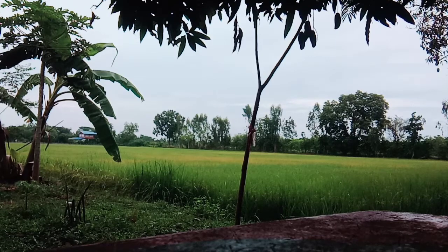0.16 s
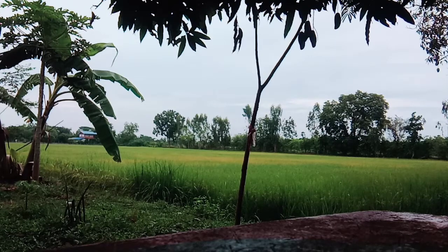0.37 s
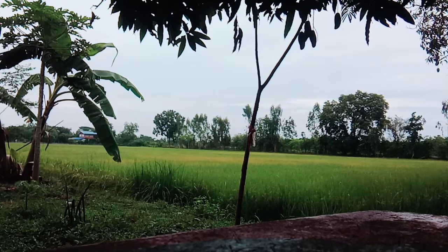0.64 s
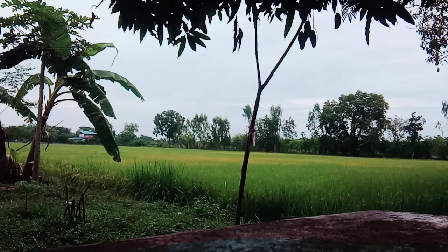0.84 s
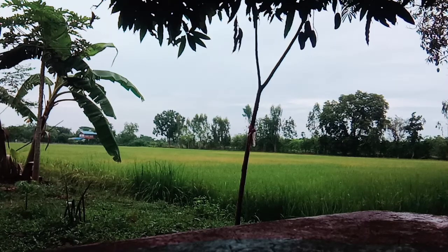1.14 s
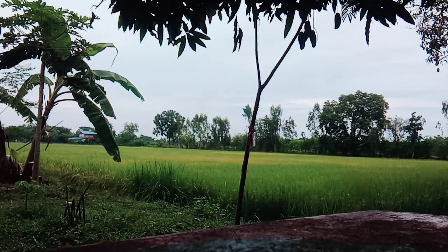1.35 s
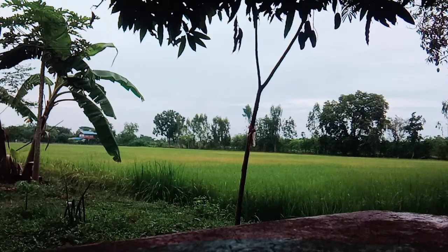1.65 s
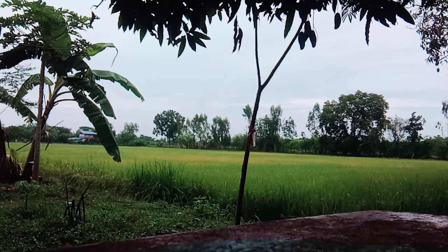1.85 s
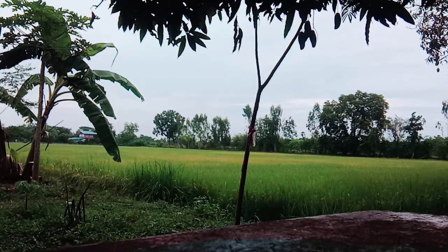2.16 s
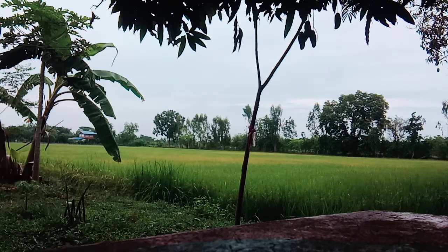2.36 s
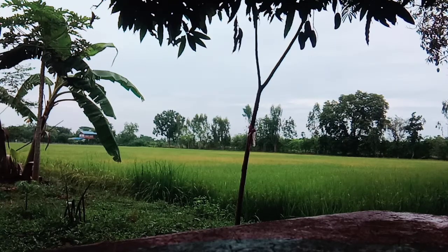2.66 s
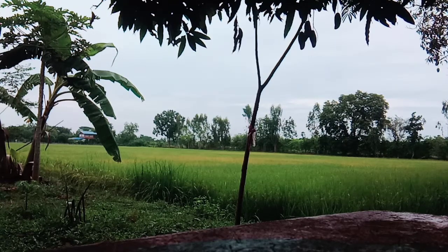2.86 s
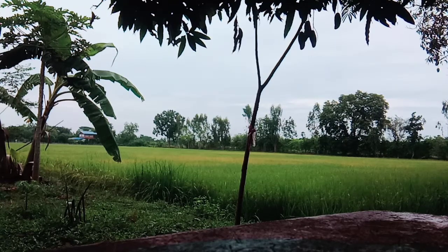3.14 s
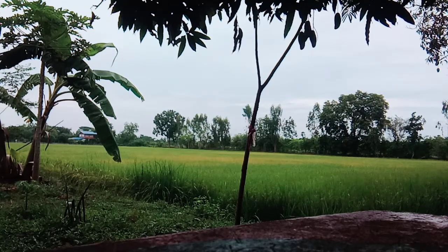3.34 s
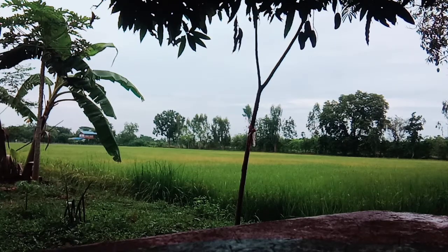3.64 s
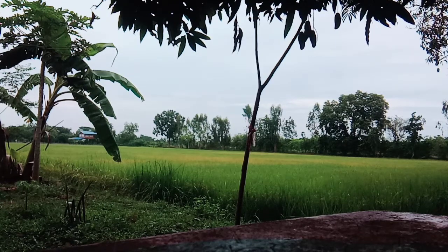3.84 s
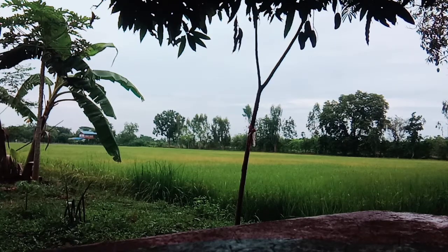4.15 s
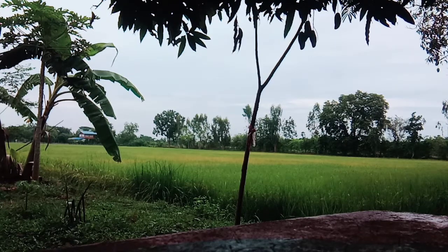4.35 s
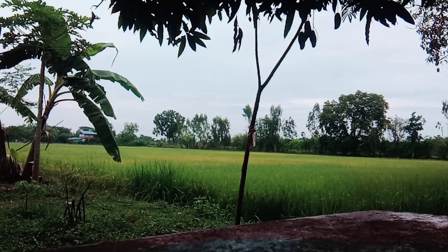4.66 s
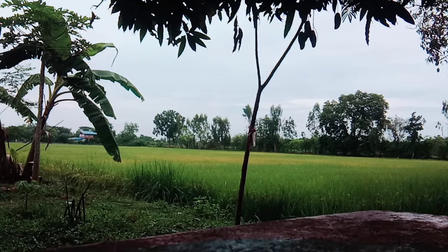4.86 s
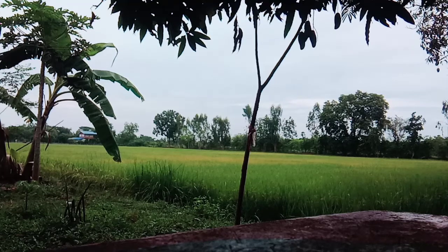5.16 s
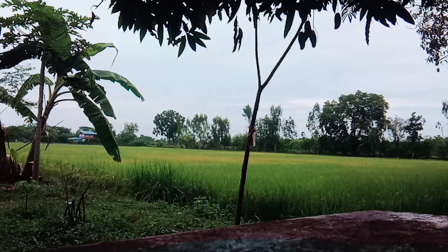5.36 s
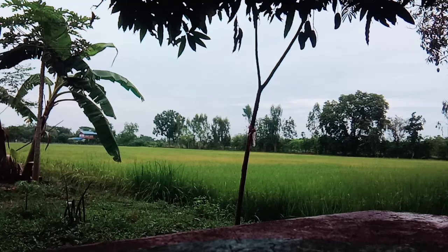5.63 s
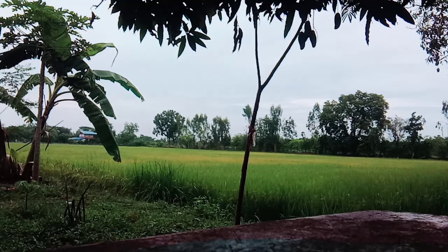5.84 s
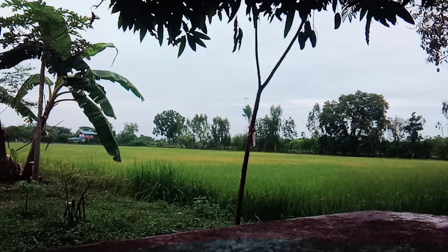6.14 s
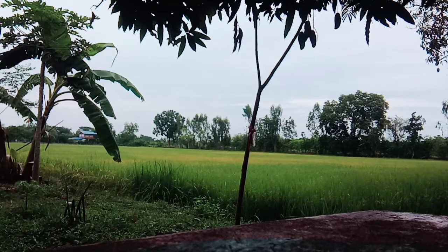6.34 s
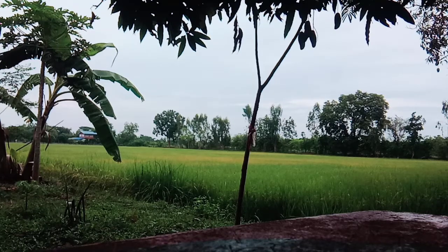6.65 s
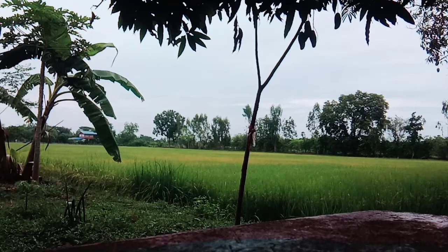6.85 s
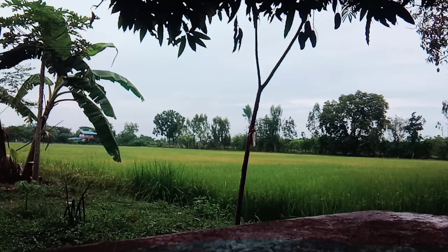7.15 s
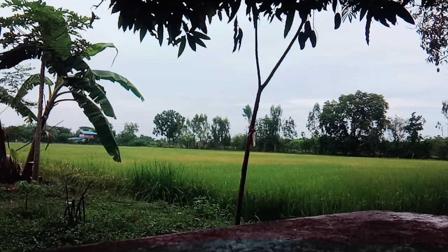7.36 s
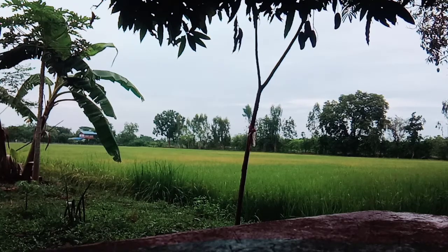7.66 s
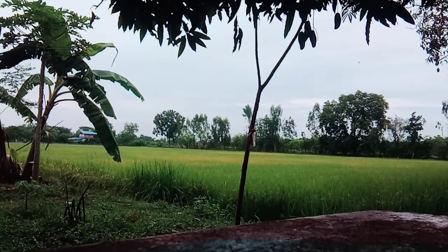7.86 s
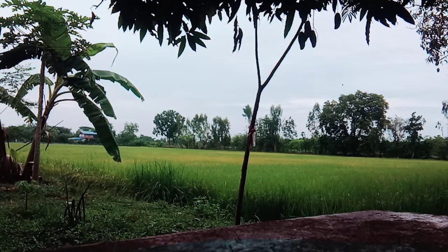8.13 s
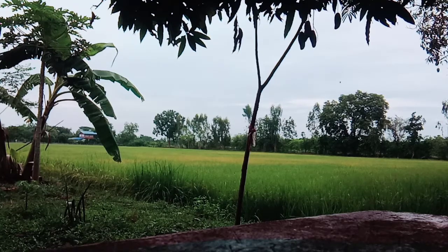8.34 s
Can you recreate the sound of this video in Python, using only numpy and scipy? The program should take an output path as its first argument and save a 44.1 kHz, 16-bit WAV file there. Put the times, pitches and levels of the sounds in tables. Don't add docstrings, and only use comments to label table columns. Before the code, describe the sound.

Quiet morning beside a rice field, heard from one fixed microphone. A nearby sparrow gives sharp, three-part falling chirps about every 0.8 seconds. A cuckoo-like bird whistles repeated arches and a stepping flourish, another answers fainter, then the flourish returns. Low hollow hoots join in the second half, with a couple of dull wooden knocks. Thin insect hiss, distant songbirds and a faint revving engine lie behind.

```python
import sys
import numpy as np
from scipy import signal
from scipy.fft import rfft, irfft
from scipy.io import wavfile
from scipy.ndimage import uniform_filter1d

SR = 44100
rng = np.random.default_rng(int(sys.argv[2]) if len(sys.argv) > 2 else 0)


def waveform_to_disk(signal):
    frames = np.transpose(np.atleast_2d(signal))
    scaled = np.clip(frames, -1, 1) * 32767
    samples = np.round(scaled).astype(np.int16)
    wavfile.write(sys.argv[1], SR, samples)


def rack_gain(trim_db):
    fader = np.asarray(trim_db, float)
    return 10 ** (fader / 20)


N = 374850


def line(rows):
    s, *columns = np.transpose(rows)
    return [np.interp(np.arange(N) / SR, s, c) for c in columns]


def unit(x):
    return x / np.sqrt(np.mean(x ** 2))


def add(out, s, x):
    i = int(s * SR)
    out[i:i + len(x)] += x[:N - i]


def walk(rate, size=N):
    hold = max(int(SR / rate), 2)
    steps = np.repeat(rng.standard_normal(size // hold + 1), hold)
    return 1.262 * uniform_filter1d(uniform_filter1d(steps, hold), hold)[:size]


def shaped(gain):
    spectrum = rfft(rng.standard_normal(N))
    return unit(irfft(spectrum * gain(np.arange(N // 2 + 1) * SR / N + 1), N))


def band(hz, width_hz):
    return shaped(lambda f: np.exp(-((f - hz) / (.6 * width_hz)) ** 4))


def echoes(x, wet_db, t60, density):
    t = np.arange(int(.6 * SR)) / SR
    chance = rng.random(len(t))
    reflected = (chance < density / SR) * rng.standard_normal(len(t))
    tail = reflected * 1000. ** (-t / t60) * (t > .002)
    tail *= rack_gain(wet_db) / np.sqrt(np.sum(tail ** 2))
    tail[0] = 1
    return signal.fftconvolve(x, tail) / np.sqrt(np.sum(tail ** 2))


def tone(hz):
    return np.sqrt(2) * np.sin(2 * np.pi * np.cumsum(hz) / SR)


def whistles(rows, turn, flutter_db, wet_db, t60, waver=0.0029, fade_db=-3):
    out = np.zeros(N)
    for start, length, first, top, last, db in rows:
        u = np.linspace(0, 1, int(length * SR))
        up = np.clip(u / turn, 0, 1)
        down = np.clip((u - turn) / (1 - turn), 0, 1)
        pitch = first + (top - first) * np.sin(up * np.pi / 2) + (last - top) * down ** 1.517
        pitch *= 1 + waver * walk(70.5, size=30000)[:len(u)]
        swell = np.clip(np.minimum(u, 1 - u) * length / 0.0041, 0, 1)
        level_db = db + fade_db * down + flutter_db * walk(62.0, size=30000)[:len(u)]
        add(out, start, rack_gain(level_db) * swell * tone(pitch))
    return echoes(out, wet_db, t60, density=3000)[:N]


def chatter(low_hz, high_hz, length, glide, count):
    out, u = np.zeros(N), np.linspace(0, 1, int(length * SR))
    for when, place, slope, size in rng.random((count, 4)):
        pitch = low_hz * (high_hz / low_hz) ** place * (1 + glide * (2 * slope - 1) * u)
        add(out, when * N / SR, rack_gain(3 * size) * np.sin(np.pi * u) * tone(pitch))
    return unit(echoes(out, wet_db=1.5, t60=0.45, density=3000)[:N])


# (f/Hz, level/dB per Hz)
FIELD_SPECTRUM = [(15, -48), (25, -16), (106, 1.5), (220, -7), (346, -19.5), (508, -31.5), (1020, -14),
                  (1760, -28.5), (2840, -14.5), (3990, -24), (4670, -19.5), (5000, -32.5), (5600, -50),
                  (7280, -63.5), (12300, -120)]
# (t/s, far bird level/dB, breeze level/dB)
CHORUS_COURSE = [(0.0, -60.5, -70.5), (0.4, -57.5, -79.5), (0.92, -50.5, -74), (1.35, -54.5, -60.5),
                 (1.8, -50.5, -78), (2.1, -58, -65), (2.45, -55.5, -79), (2.9, -59.5, -75),
                 (3.5, -58.5, -76.5), (3.8, -53, -84), (4.8, -55.5, -75), (5.45, -53.5, -85),
                 (6.15, -61, -76.5), (6.6, -55, -73.5), (7.3, -55, -61), (7.75, -54.5, -67),
                 (8.05, -75.5, -72.5), (8.5, -56.5, -63.5)]
# (f/Hz, width/Hz, level/dB)
INSECT_BANDS = [
    (4756, 540, -63),
    (6938, 760, -68),
    (8100, 810, -94),
    (10700, 1300, -90.5),
]


def field():
    hz, db = np.transpose(FIELD_SPECTRUM)
    out = rack_gain(-48) * shaped(lambda f: rack_gain(np.interp(np.log(f), np.log(hz), db, right=-150)))
    low_db, rustle_db = line(CHORUS_COURSE)
    high_db = -56.5 + 0.27 * (low_db - low_db.mean()) + 1.8 * walk(5)
    out += rack_gain(rustle_db - 2.5 + 4.0 * walk(15)) * band(369, 570)
    low_notes = chatter(800, 1290, length=0.089, glide=0.099, count=400)
    out += rack_gain(low_db - 5) * (0.89 * low_notes + 1.08 * band(997, 630))
    high_notes = chatter(2300, 4200, length=0.0498, glide=0.23, count=700)
    out += rack_gain(high_db - 0.5) * (0.56 * high_notes + 0.75 * band(2510, 2200))
    for centre, width, level_db in INSECT_BANDS:
        out += rack_gain(level_db + 0.5 * walk(3.6) + 1.45 * walk(90)) * band(centre, width)
    hiss = shaped(lambda f: (f > 5000) * (7000 / f) ** 1.64)
    return out + rack_gain(-80.5) * hiss


# (t/s, firing rate f/Hz, level/dB)
ENGINE_REVS = [(0.0, 113, -57.5), (0.4, 100, -56), (0.8, 116.6, -53.5), (1.32, 123.5, -48.5),
               (1.9, 114, -54), (2.3, 105, -65), (2.85, 109, -62.5), (3.36, 113, -49), (3.5, 110, -61),
               (4.3, 93, -65.5), (4.55, 80, -57.5), (4.99, 115, -53), (5.73, 118, -50), (6.0, 119, -68),
               (6.25, 110, -55), (6.91, 119, -48), (7.7, 109.6, -56), (8.5, 114.8, -50)]


def engine():
    hz, db = line(ENGINE_REVS)
    hz = hz * (1 + 0.0246 * walk(25))
    second_db = -60 - 0.03 * (db - db.mean())
    first = rack_gain(db + 2.5 * walk(7.8)) * tone(hz)
    return first + rack_gain(second_db + 3.33 * walk(7)) * tone(2 * hz)


# (from t/s, to t/s, rasp rate f/Hz, centre f/Hz, width/Hz, level/dB)
KATYDID_SONG = (2.3, 6.15, 8.6, 8800, 900, -88)


def katydid():
    start, end, rate, hz, width_hz, db = KATYDID_SONG
    t = np.arange(N) / SR
    beat = np.sin(np.pi * np.cumsum(rate * (1 + .04 * walk(2))) / SR) ** 2
    fade = np.clip(np.minimum(t - start, end - t) / .2, 0, 1)
    return rack_gain(db) * beat * fade * band(hz, width_hz)


# (from t/s, to t/s, pulse rate f/Hz, start f/Hz, end f/Hz, level/dB)
CRICKET_SONG = (0.02, 8.45, 21.8, 4350, 5050, -60)


def cricket():
    start, end, rate, low, high, db = CRICKET_SONG
    out, u = np.zeros(N), np.linspace(0, 1, int(.015 * SR))
    for s in np.arange(start, end, 1 / rate):
        stroke = np.sin(np.pi * u) * tone(low + (high - low) * u)
        add(out, s, rack_gain(db + 1.8 * rng.standard_normal()) * stroke)
    return rack_gain(1.5 * walk(1.5)) * echoes(out, wet_db=-7, t60=.15, density=1700)[:N]


# (t/s, length/s, centre f/Hz, width/Hz, level/dB)
LEAF_STIRS = [(0.804, 0.15, 403, 149, -63.5), (1.152, 0.51, 1540, 456, -59.5),
              (1.723, 0.087, 434, 200, -64), (2.584, 0.035, 550, 298, -63), (2.812, 0.042, 416, 202, -67.5),
              (3.708, 0.099, 585, 402, -54), (4.422, 0.072, 630, 252, -58), (7.177, .12, 470, 396, -56.5),
              (7.373, 0.074, 506, 403, -59), (8.132, 0.046, 486, 396, -60.5)]


def stirs():
    out = np.zeros(N)
    for start, length, hz, width_hz, db in LEAF_STIRS:
        u = np.linspace(0, 1, int(length * SR))
        level = rack_gain(db + 1.5 * walk(60, size=30000)[:len(u)])
        add(out, start, level * np.sin(np.pi * u) ** 0.37 * band(hz, width_hz)[:len(u)])
    return out


# (t/s, level/dB, ring f/Hz, second ring f/Hz, t60/s)
HOLLOW_KNOCKS = [
    (3.658, -47, 292.5, 346, 0.28),
    (3.728, -55, 356, 292, 0.18),
    (4.412, -38, 334, 429, 0.099),
    (4.439, -55, 359, 441, 0.11),
]


def knocks():
    out, t = np.zeros(N), np.arange(int(.3 * SR)) / SR
    for start, db, low, high, t60 in HOLLOW_KNOCKS:
        ring = np.sin(2 * np.pi * low * t) + 0.3 * np.sin(2 * np.pi * high * t)
        add(out, start, rack_gain(db + 11.0) * ring * (1 - np.exp(-t / 0.0049)) * 1000. ** (-t / t60))
    return echoes(out, wet_db=6.0, t60=0.21, density=800)[:N]


# (t/s, peak level/dB, f/Hz)
BARBET_HOOTS = [(3.608, -54.5, 703), (4.247, -51, 700), (4.514, -50.5, 660), (4.776, -49, 685),
                (5.054, -56, 650), (5.327, -50.5, 723), (5.583, -42.5, 698), (5.854, -47, 731),
                (6.148, -49, 712), (6.428, -47, 708), (6.724, -43.5, 708), (7.127, -44, 752),
                (7.296, -48.5, 668), (7.409, -49.5, 715), (7.535, -48.5, 693), (7.826, -46, 716),
                (8.147, -50, 690), (8.367, -48.5, 700)]


def barbet():
    out, t = np.zeros(N), np.arange(int(.09 * SR)) / SR
    swell = (1 - np.exp(-t / 0.0053)) * np.exp(-(t / 0.025) ** 2)
    swing = 1.06 - 0.18 * np.exp(-t / 0.014)
    for start, db, hz in BARBET_HOOTS:
        add(out, start - .004, rack_gain(db + 2.5) * swell * tone(hz * swing))
    return echoes(out, wet_db=1, t60=.4, density=1500)[:N]


# (t/s, length/s, top f/Hz, bottom f/Hz,
# level/dB)
HARSH_CHACKS = [(0, 0.03, 4600, 3010, -53), (0.816, 0.05, 3200, 1900, -48), (.875, .012, 3600, 2300, -50),
                (3.535, 0.055, 3500, 2200, -53), (3.655, .1, 2900, 2500, -56),
                (3.768, 0.014, 2900, 1600, -49), (4.698, .055, 4300, 2550, -44.5),
                (5.614, 0.054, 4070, 2675, -50.5), (6.306, 0.045, 3600, 2700, -46.5),
                (6.69, .09, 3800, 2630, -49.5), (7.539, 0.13, 3500, 2730, -54),
                (7.994, .05, 4190, 2685, -43), (8.037, 0.04, 2700, 2230, -52.5)]


def chacks():
    out = np.zeros(N)
    for start, length, top, bottom, db in HARSH_CHACKS:
        u = np.linspace(0, 1, int(length * SR))
        fall = (top + bottom) / 2 + .55 * (top - bottom) * (.5 - u)
        pitch = fall * (1 + .14 * walk(700, size=9000)[:len(u)])
        strokes = unit(rack_gain(4.0 * walk(300, size=9000)[:len(u)]))
        add(out, start, rack_gain(db + 3.0) * strokes * np.sin(np.pi * u) ** 0.2 * tone(pitch))
    return echoes(out, wet_db=4.5, t60=.35, density=2500)[:N]


# (t/s, length/s, level/dB)
SEEP_CALLS = [(0.08, .16, -56.5), (1.051, 0.16, -58.5), (1.884, .2, -60), (2.551, 0.19, -64),
              (3.496, .13, -59.5), (5.49, 0.087, -61.5)]
# (start f/Hz, middle f/Hz, end f/Hz)
SEEP_PITCH = (3940, 3760, 3560)
# (t/s, length/s, start f/Hz, end f/Hz, level/dB)
SLURS = [(1.111, .06, 3110, 3560, -62.5), (1.227, 0.064, 3500, 4420, -63), (3.87, 0.033, 2080, 2290, -55.5),
         (3.938, 0.092, 2463, 2875, -54.5), (4.146, 0.036, 2326, 2330, -51),
         (4.205, 0.068, 2340, 2766, -51), (4.447, 0.049, 2343, 2377, -53), (4.497, .073, 2430, 2663, -52),
         (4.618, 0.07, 2825, 3280, -58), (6.099, 0.17, 2456, 2304, -60.5), (6.521, 0.2, 2384, 2274, -62),
         (6.651, 0.053, 3490, 3440, -50), (6.923, 0.13, 3000, 3760, -61), (7.41, 0.054, 3530, 3602, -42),
         (7.475, 0.026, 3580, 3530, -49.5), (7.76, 0.15, 3480, 3240, -55), (8.249, 0.18, 2650, 3350, -60.5),
         (8.40, .07, 2600, 3200, -59.5), (8.45, .05, 3465, 3490, -53)]
# (t/s, length/s, f/Hz, level/dB)
DISTANT_NOTES = [(0, 0.066, 1275, -62), (0.502, 0.23, 711.5, -60.5), (0.904, 0.15, 707, -61),
                 (1.05, 0.28, 868, -61), (2.306, 0.17, 1283, -63), (2.402, 0.28, 960, -66.5),
                 (2.852, 0.25, 882, -61.5), (2.853, 0.58, 1251, -61.5), (3.304, 0.34, 871, -71),
                 (3.95, 0.17, 721, -64.5), (4.897, 0.08, 775, -58.5), (4.902, 0.15, 1010, -61),
                 (5.016, 0.19, 936, -74.5), (5.05, 0.67, 820, -72), (5.5, 0.12, 1228, -61.5),
                 (5.553, 0.376, 1047, -72), (5.98, 0.027, 1227, -55), (6.211, 0.15, 1234, -62.5),
                 (6.25, 0.27, 888, -61), (6.466, 0.07, 1211, -59.5), (6.448, 0.055, 1023, -60.5),
                 (6.716, 0.071, 1235, -62), (6.778, 0.26, 654, -65.5), (6.798, 0.36, 950, -71.5),
                 (7.284, 0.12, 1253, -64), (7.33, 0.21, 1012, -68.5), (7.546, 0.32, 863, -63.5),
                 (8.328, 0.084, 1032, -62.5)]


def songbirds():
    midway = .42
    rows = [(s, length, *SEEP_PITCH, db) for s, length, db in SEEP_CALLS]
    rows += [(s, length, first, first + midway * (last - first), last, db)
             for s, length, first, last, db in SLURS]
    held = [(s, length, hz, hz, .98 * hz, db) for s, length, hz, db in DISTANT_NOTES]
    thin = whistles(rows, turn=.52, flutter_db=1.7, wet_db=-2.5, t60=0.9, waver=0.0054, fade_db=0.5)
    faint = whistles(held, turn=0.33, flutter_db=2.5, wet_db=-1.5, t60=0.36, waver=0.01945, fade_db=-0.5)
    return thin + faint


# (t/s, length/s, level/dB)
NEAR_ARCHES = [(0.059, 0.14, -48.5), (0.272, 0.13, -48), (0.499, 0.15, -47.5), (.73, 0.18, -48.5),
               (.97, .16, -48), (1.23, 0.19, -49), (1.503, 0.11, -46.5)]
# (t/s, length/s, crest f/Hz, end f/Hz, level/dB)
FLOURISH_NOTES = [(1.63, 0.16, 1196, 1119, -43), (1.817, 0.12, 1172, 1070, -46.5),
                  (2.006, 0.14, 1161, 907, -44), (4.30, 0.15, 1212, 1194, -43),
                  (4.435, 0.11, 1153, 1070, -47), (4.535, .071, 1145, 1036, -45.5),
                  (4.631, .13, 1166, 936, -43)]
# (t/s, level/dB)
GRACE_NOTES = [(1.60, -41.5), (1.788, -44), (1.805, -46.5), (1.888, -43.5), (1.993, -47.5), (4.287, -41),
               (4.523, -45), (4.619, -44)]
# (t/s, length/s, crest f/Hz, level/dB)
FAR_ARCHES = [(2.489, 0.072, 1165, -55), (2.677, 0.018, 1097, -53), (2.745, 0.027, 1100, -52),
              (2.834, 0.037, 1101, -50.5), (2.93, .088, 1214, -53), (3.09, 0.095, 1220, -55),
              (3.26, .10, 1222, -55.5), (3.45, 0.11, 1222, -54), (3.652, .105, 1235, -55.5),
              (3.85, .13, 1203, -53.5), (4.08, .11, 1212, -56.5)]


def cuckoos():
    crest_hz, sag_hz_s = 1228, 502
    far_sag_hz_s = 1465
    grace_s, grace_hz = 0.033, 956.6
    near = [(s, length, 905, crest_hz, crest_hz - sag_hz_s * length, db) for s, length, db in NEAR_ARCHES]
    near += [(s, length, 0.94 * crest, crest, end, db) for s, length, crest, end, db in FLOURISH_NOTES]
    near += [(s, grace_s, 0.947 * grace_hz, grace_hz, 0.984 * grace_hz, db) for s, db in GRACE_NOTES]
    far = [(s, length, 1030, crest, crest - far_sag_hz_s * length, db)
           for s, length, crest, db in FAR_ARCHES]
    out = whistles(near, turn=.3, flutter_db=2, wet_db=-7, t60=.45, waver=.003, fade_db=-4)
    return out + whistles(far, turn=.45, flutter_db=1.2, wet_db=-8, t60=.5, fade_db=0)


def warble(dip, loudest, crest_hz, db):
    scoop_s, swell_s, release_s = 0.0159, .007, 0.0239
    dip_db = -11
    t = np.arange(dip, loudest + release_s, 1 / SR)

    def chance(rate):
        return walk(rate, size=3000)[:len(t)]

    corners = [dip, min(dip + scoop_s, loudest), loudest + swell_s, loudest + release_s]
    bend = np.interp(t, corners, [.86, 1, 1, .9])
    swell = np.exp(-((t - loudest) / swell_s) ** 2)
    roughness = .035 - .028 * swell
    pitch = crest_hz * uniform_filter1d(bend, size=150) * (1 + roughness * chance(700))
    edges = np.clip(np.minimum((t - dip) / 0.0032, (t[-1] - t) / .008), 0, 1)
    voice = rack_gain(dip_db * (1 - swell) + 2.57 * chance(310)) * tone(pitch)
    rasp = rack_gain(dip_db + 1.5 + 4.0 * chance(400)) * tone(pitch * (1 + .1 * chance(700)))
    second = rack_gain(-50) * tone(2 * pitch * (1 + 0.018 * chance(900)))
    third = rack_gain(-48.5) * (pitch / 5000) ** 3 * tone(3 * pitch * (1 + .025 * chance(900)))
    return rack_gain(db - 2.0) * edges * (voice + rasp + second + third)


# (dip t/s, loudest t/s, crest f/Hz, level/dB)
SPARROW_WARBLES = [(0.595, 0.608, 4990, -29.5), (0.624, 0.65, 4600, -26), (.664, 0.682, 3340, -34.5),
                   (1.338, 1.354, 4980, -31), (1.376, 1.398, 4564, -29), (1.414, 1.434, 3634, -37),
                   (2.178, 2.197, 4950, -32), (2.213, 2.232, 4460, -27), (2.248, 2.265, 3344, -30.5),
                   (3.06, 3.086, 4940, -36.5), (3.100, 3.12, 4540, -27.5), (3.138, 3.159, 3524, -37),
                   (4.12, 4.128, 4730, -38.5), (4.149, 4.17, 4517, -29), (4.185, 4.209, 3423, -35),
                   (4.847, 4.871, 4996, -31), (4.884, 4.898, 4570, -31), (4.919, 4.943, 3550, -37),
                   (5.76, 5.797, 5000, -35), (5.795, 5.817, 4533, -31), (5.838, 5.857, 3590, -33.5),
                   (6.423, 6.431, 5160, -35), (6.453, 6.486, 4520, -29.5), (6.497, 6.523, 3850, -34),
                   (7.330, 7.34, 5150, -31.5), (7.358, 7.376, 4555, -27), (7.398, 7.421, 3588, -36.5),
                   (7.925, 7.94, 4930, -28.5), (7.958, 7.982, 4540, -26.5), (7.998, 8.017, 3700, -35)]
# (t/s, top f/Hz, level/dB)
OPENING_SLIDES = [(.578, 5890, -51.5), (1.316, 5580, -51), (2.159, 6400, -58.5), (3.041, 7600, -57.5),
                  (4.106, 5830, -53.5), (4.818, 7400, -59.5), (5.746, 5900, -55.5), (6.404, 6320, -57.5),
                  (7.312, 5800, -53.5), (7.900, 5320, -46.5)]


def sparrow():
    out = np.zeros(N)
    slide_end_hz, slide_rise_db = 5000, 5.5
    for (start, top_hz, db), warbles in zip(OPENING_SLIDES, np.reshape(SPARROW_WARBLES, (-1, 3, 4))):
        voice = np.zeros(int(.16 * SR))
        u = np.linspace(0, 1, int((warbles[0, 0] + .005 - start) * SR))
        pitch = (top_hz + (slide_end_hz - top_hz) * u) * (1 + .05 * walk(900, size=3000)[:len(u)])
        level = rack_gain(db + slide_rise_db * u + 5.3 * walk(414, size=3000)[:len(u)])
        add(voice, 0, level * np.sin(np.pi * u) * tone(pitch))
        for row in warbles:
            add(voice, row[0] - start, warble(*row))
        add(out, start, echoes(voice, wet_db=-1.4, t60=0.28, density=2500))
    return out


def scene():
    background = field() + engine() + katydid() + cricket() + stirs() + knocks()
    birds = barbet() + chacks() + songbirds() + cuckoos() + sparrow()
    return (background + birds)[None]


def roll_off(x):
    return signal.sosfilt(signal.butter(12, 15600, fs=SR, output="sos"), x)


def record(dry):
    dry = signal.sosfilt(signal.butter(2, 48, "high", fs=SR, output="sos"), dry)
    dry = np.pad(dry, ((0, 0), (0, 2048)), mode="reflect")
    hz, _, cells = signal.stft(dry, SR, nperseg=1024, noverlap=768, boundary="even", padded=True)
    power = uniform_filter1d(uniform_filter1d(abs(cells) ** 2, size=9, axis=2), size=3, axis=1)
    floor = np.median(power, axis=2, keepdims=True)
    strength = np.interp(hz, [200, 350, 2500, 4500], [0.043, 0.41, 0.51, 0.19])[:, None]
    bass_cut = rack_gain(np.interp(hz, [180, 330], [-3, 0]))[:, None]
    gain = bass_cut * np.maximum(1 - strength * floor / power, rack_gain(-11.5))
    quiet = signal.istft(cells * gain, SR, nperseg=1024, noverlap=768)[1][:, :N]
    return roll_off(quiet)


dry = scene()
out = record(dry)
waveform_to_disk(out)
```